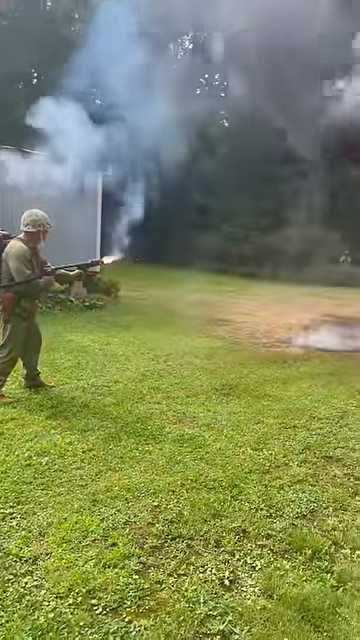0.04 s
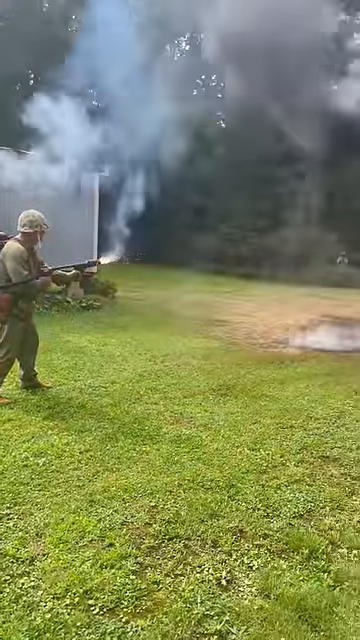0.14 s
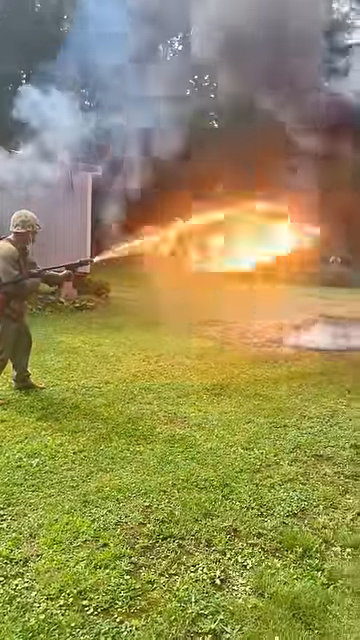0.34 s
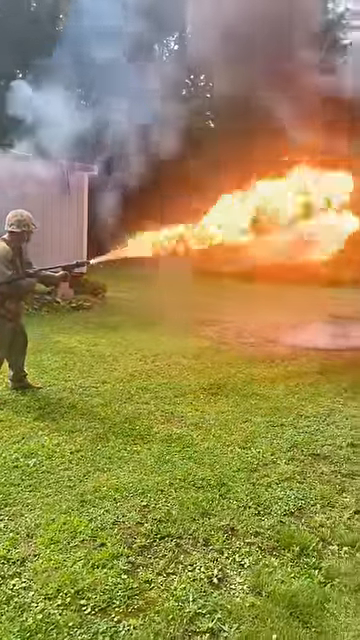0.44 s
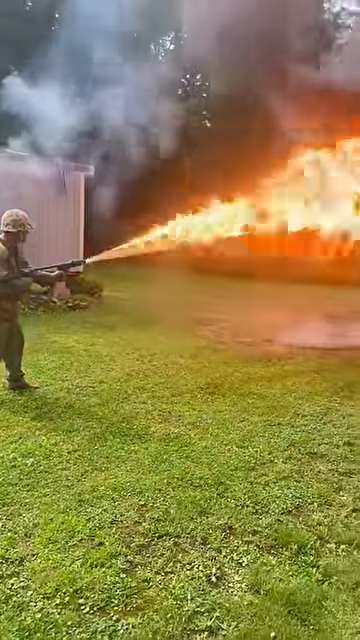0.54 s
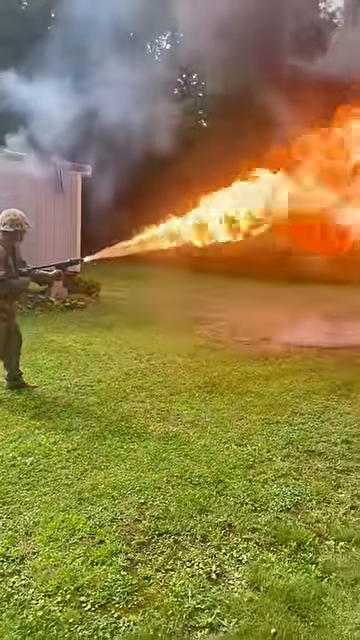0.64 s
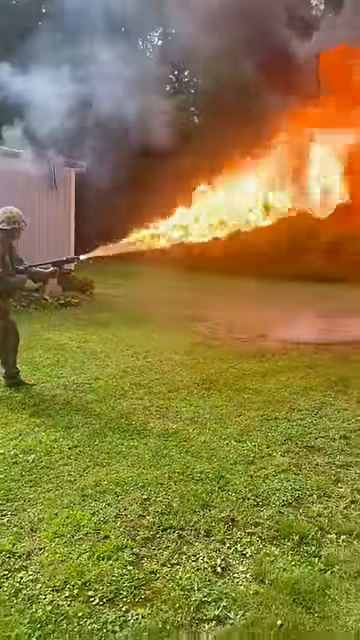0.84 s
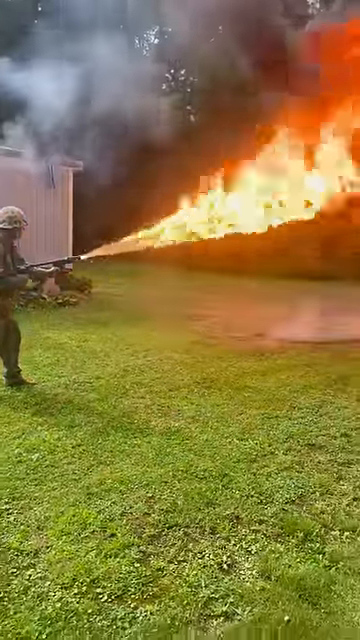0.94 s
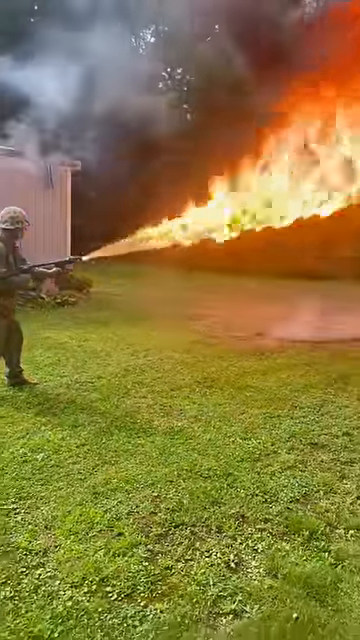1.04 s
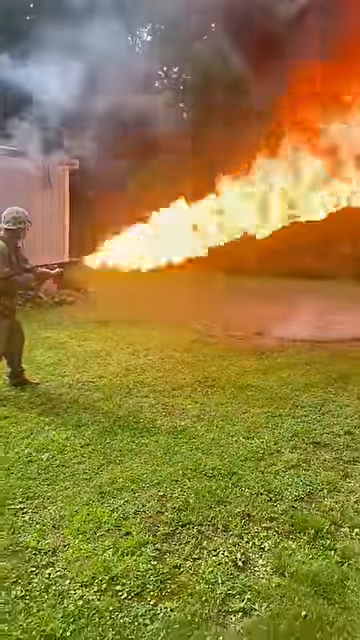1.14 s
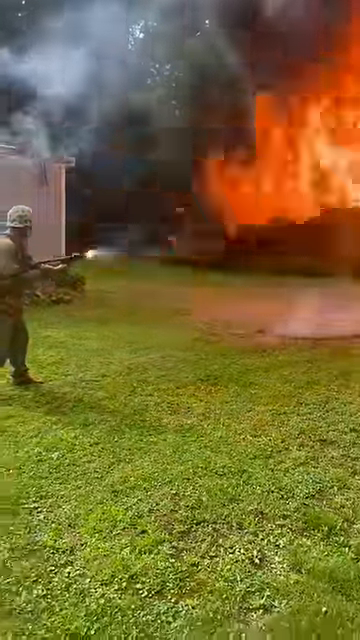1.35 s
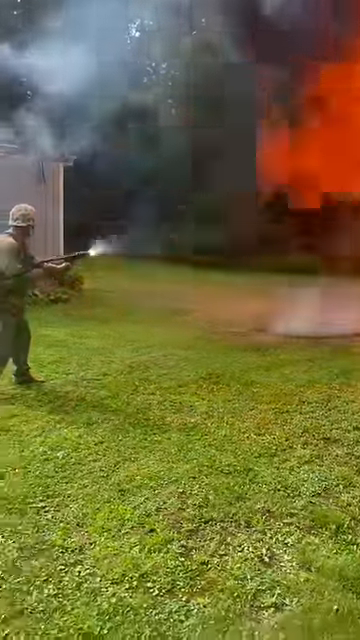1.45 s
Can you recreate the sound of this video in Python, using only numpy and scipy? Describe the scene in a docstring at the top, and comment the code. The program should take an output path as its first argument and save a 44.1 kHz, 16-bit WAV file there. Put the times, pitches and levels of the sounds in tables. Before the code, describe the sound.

A flamethrower ignites and roars outdoors, then cuts off with a lingering hiss.

```python
"""A flamethrower burst on a lawn

The trigger scrapes, the fuel lights with a rush, and pockets of burning fuel thump and roar in the jet.
When the valve shuts the fireball dies down; gas keeps hissing and rings the nozzle in a faint whistle.
A phone some metres away picks this up in stereo, over a quiet outdoor background."""
import sys
import numpy as np
from scipy import signal
from scipy.fft import rfft, irfft, next_fast_len
from scipy.io import wavfile
from scipy.ndimage import uniform_filter1d

SR = 44100
rng = np.random.default_rng(int(sys.argv[2]) if len(sys.argv) > 2 else 0)


def store_pcm(level_fs):
    """Save levels as 16-bit WAV."""
    pcm = np.round(np.clip(level_fs, -1, 1) * 32767).astype(np.int16)
    wavfile.write(sys.argv[1], SR, np.atleast_2d(pcm).T)


N = 66150
TIME = np.arange(N) / SR
FFT_SIZE = next_fast_len(N + 4096)
BIN_HZ = np.arange(FFT_SIZE // 2 + 1) * SR / FFT_SIZE


def flame():
    """Combustion noise: big pockets of fuel thump and rumble, smaller ones roar, and the jet rushes."""
    # Each row: time in seconds, then the levels of thump, rumble, roar and jet in dB.
    levels = [(0.177, -57, -57, -67, -66), (0.181, -48, -42, -40, -49), (0.195, -32, -38.5, -31, -38),
              (0.208, -35, -28, -25, -37), (0.221, -30, -20, -22.5, -39.5), (0.253, -25, -25, -28, -35.5),
              (0.283, -26, -23, -28, -34), (0.297, -15, -13, -28, -33), (0.323, -9.5, -19, -28, -31),
              (0.353, -13.5, -11, -21.5, -29), (0.385, -6.5, -20, -21, -30),
              (0.411, -17.5, -16.5, -21, -30), (0.431, -12.5, -17.5, -24, -34),
              (0.455, -14, -15, -23.5, -31.5), (0.481, -15, -24, -25.5, -33.5),
              (0.515, -13, -19.5, -23, -33.5), (0.537, -13, -19.5, -23, -30),
              (0.581, -16.5, -21.5, -24, -30.5), (0.617, -15, -11.5, -21, -29),
              (0.629, -9, -16, -23, -29.5), (0.707, -17.5, -20, -24.5, -33.5),
              (0.725, -17, -31, -24, -32.5), (0.757, -16, -18, -24.5, -33), (0.787, -16, -25, -23, -31),
              (0.813, -23, -16.5, -24, -31), (0.865, -13.5, -17.5, -23, -32.5), (0.905, -13, -15, -21, -31),
              (0.957, -17.5, -19, -22, -34), (0.989, -10, -15.5, -20, -33.5),
              (1.015, -15.5, -21.5, -24, -30), (1.031, -18, -14, -23.5, -32.5),
              (1.062, -12.5, -19, -19, -30.5), (1.094, -12.5, -14, -20, -31.5),
              (1.118, -16.5, -16.5, -24, -34.5), (1.154, -14.5, -12.5, -25, -37),
              (1.18, -19, -19, -27.5, -40), (1.21, -13, -27, -29.5, -40), (1.236, -24, -33, -32, -42.5),
              (1.262, -18, -32, -32.5, -47), (1.313, -24.5, -29.5, -37, -50), (1.339, -33.5, -36, -40, -56),
              (1.39, -28.5, -36, -42, -59), (1.43, -32.5, -37, -44, -63), (1.46, -31, -38, -44.5, -62),
              (1.5, -49, -39, -46, -66)]
    # Each row of these four spectra: frequency in Hz, relative level in dB.
    thump_spectrum = [(20, -22), (32, -11.5), (45, -3.5), (62, 1.5), (85, -2), (110, -14.5), (200, -32.5)]
    rumble_spectrum = [(50, -32), (85, -5.5), (110, -0.5), (150, -3), (190, -7), (240, -17), (400, -39)]
    roar_spectrum = [(150, -38), (250, -5.5), (320, -0.5), (366, 3.5), (420, -1.5), (470, -2), (600, -3),
                     (800, -6.5), (1200, -9), (1430, -12), (1550, -8.5), (1680, -12.5), (1900, -18),
                     (3000, -29.5)]
    jet_spectrum = [(1000, -8), (1900, -1.5), (2300, -1), (2580, 0), (3000, -4), (3370, -1.5), (3560, -2),
                    (3750, -6.5), (4060, -0.5), (4250, -4), (4700, -8), (5120, -5.5), (5500, -9.5),
                    (6000, -9.5), (9000, -25), (16000, -37)]
    thump = flicker(puffs(900, 1.54), thump_spectrum, band_db=0.95, rate_hz=16.2, common_db=-0.2)
    rumble = flicker(puffs(900, 1.87), rumble_spectrum, band_db=0.8, rate_hz=25, common_db=0.4)
    roar = flicker(puffs(6000, 1.34), roar_spectrum, band_db=1.15, rate_hz=18, common_db=0.22)
    jet = flicker(puffs(15000, 1.5), jet_spectrum, band_db=0.63, rate_hz=12.4, common_db=0.5)
    thump = compress(thump, 0.8, window_s=0.023)
    rumble = compress(rumble, 0.6, window_s=0.021)
    return sum(x * envelope(levels, column) for column, x in enumerate((thump, rumble, roar, jet), 1))


def ignition():
    """A gliding oscillation: the fireball rings once as it lights, its pitch falling as it grows."""
    start_s, end_s, rise_s, decay_s = 0.2255, 0.269, 0.002, 0.004
    growth = np.clip((TIME - start_s) / (end_s - start_s), 0, 1)
    hz = np.interp(growth, [0, 1], [157, 48])
    level_db = np.interp(growth, [0, 1], [-10.25, -5.75])
    attack = np.clip((TIME - start_s) / rise_s, 0, 1)
    decay = np.exp(-np.maximum(TIME - end_s, 0) / decay_s)
    swing = np.sin(2 * np.pi * np.cumsum(hz * (TIME > start_s)) / SR)
    return swing * attack * decay * undb(level_db)


def nozzle():
    """Forced resonance: the broadband hiss of escaping gas drives the narrow modes of the nozzle."""
    # Each row: time in seconds, level of the hiss in dB, gain of the whistle in dB.
    levels = [(0, -58, -60), (.06, -73, -74), (.176, -68, -72), (.19, -49.5, -58), (.23, -44, -46),
              (.3, -38.5, -44), (.7, -38, -38.5), (1.1, -36, -37), (1.25, -41, -43.5), (1.4, -42.5, -43),
              (1.5, -42.5, -41)]
    # Each row: frequency in Hz, relative level of the hiss in dB.
    spectrum = [(1000, -26), (1500, -14), (3000, -8.5), (6200, -7.5), (8000, -7.5), (9800, -2), (10400, -8),
                (11000, -3.5), (12200, -7), (13000, -11), (14900, -12), (15300, -1.5), (15700, -2.5)]
    # Each row: mode frequency in Hz, bandwidth in Hz, relative level in dB.
    modes = [(1550, 45, -10.5), (3524, 58, -14), (4720, 62, -23), (5480, 220, -15), (6874, 310, -7),
             (7500, 160, -29), (8570, 75, -7), (9200, 200, -17), (9460, 110, -15.5), (11300, 350, -15.5),
             (12270, 120, -25)]
    hiss = flicker(noise(), spectrum, band_db=1.17, rate_hz=8.78, common_db=1.15)
    whistle = 0
    for hz, width, db in modes:
        mode = resonate(resonate(noise(), hz, width), hz, width)
        whistle += at_level(mode * undb(1.5 * wander(rate_hz=18)), db)
    return hiss * envelope(levels, column=1) + whistle * envelope(levels, column=2)


def trigger():
    """Friction excitation: short rough scrapes ring the lever, which rattles on faintly."""
    # Each row: time of the peak in seconds, level in dB, Gaussian width in seconds.
    scrapes = [(0.125, -44, 0.003), (0.15, -59, 0.003)]
    # Each row: mode frequency in Hz, bandwidth in Hz, relative gain in dB.
    modes = [(3600, 300, 6), (4300, 900, 0), (5500, 1200, -7), (1730, 600, -6), (732, 300, 3),
             (2700, 1500, -6), (9000, 6000, -15)]
    rattle_db, rattle_s = -12, 0.012
    grit = noise()
    metal = sum(undb(db) * resonate(resonate(grit, hz, 2 * width), hz, width) for hz, width, db in modes)
    contact = 0
    for peak_s, db, width_s in scrapes:
        rattle = undb(rattle_db) * (TIME > peak_s) * np.exp(-abs(TIME - peak_s) / rattle_s)
        contact += undb(db) * (swell(peak_s, width_s) + rattle)
    return at_level(metal, 0) * contact


def distant_hum():
    """Narrowband noise: a low hum swells once before the burst."""
    hum = at_level(resonate(noise(), hz=65.4, width_hz=10.5), 0)
    return compress(hum, 0.99, window_s=0.024) * undb(-45.5) * swell(peak_s=0.078, width_s=0.022)


def lawn():
    """Ambient noise: a quiet outdoor background, strongest in the bass."""
    # Each row: frequency in Hz, relative level in dB.
    spectrum = [(25, -14), (45, -9), (65, -4.5), (110, -16), (200, -21), (500, -23), (1000, -28.5),
                (1400, -34), (1750, -30.5), (2100, -39.5), (5000, -39), (16000, -59)]
    return flicker(noise(), spectrum, band_db=1.2, rate_hz=19.0, common_db=0.4) * undb(-50.5)


def thin_tone():
    """Noise in a very narrow band is heard as a pitch: a faint high tone before the burst."""
    hz, width_hz, end_s = 5180, 30, 0.13
    tone = resonate(resonate(noise(), hz, 2 * width_hz), hz, width_hz)
    return at_level(tone, -69) * (TIME < end_s)


def stereo_image(pair):
    """Stereo width: left and right differ in phase, likeness and level from band to band."""
    # Each row: frequency in Hz, phase lead of the left in radians, likeness 0-1, left minus right in dB.
    image = [(0, 0, 1, -0.5), (249, 0, 1, 1.5), (340, 0.25, 1, 0), (426, 0.5, 0.95, -1), (585, 1, 0.5, 13),
             (850, -1.04, 1, 7), (1320, 1.5, 0.45, 7), (1624, -0.75, 1, 1.5), (1820, 1, 0.84, 3.5),
             (2590, 0.45, 0.52, -0.5), (3040, 2.5, 0.55, 4.5), (3260, 6.5, 0.67, -1), (4600, 6.5, 0.75, -1),
             (4700, 5.5, 0.8, 2.5), (6000, 7.5, 0.1, 0), (7074, 9, 1, 1), (8510, 9.5, 1, -3),
             (8950, 10.5, 0.46, 3), (9850, 11.5, 0.8, 2), (10000, 13, .99, -3), (11800, 13, 0.93, 0),
             (12700, 13.5, .35, 1), (13200, 15.5, .99, 1), (15300, 16, .99, 0), (15560, 17, .6, -1)]
    hz, *columns = np.array(image).T
    lead, likeness, pan_db = (np.interp(BIN_HZ, hz, column) for column in columns)
    likeness = np.clip(likeness, 0, 1)
    left, other = rfft(pair, FFT_SIZE)
    right = likeness * left * np.exp(-1j * lead) + np.sqrt(1 - likeness ** 2) * other
    return irfft(np.array([left * undb(pan_db / 2), right * undb(-pan_db / 2)]), FFT_SIZE)[:, :N]


def puffs(per_s, scatter_db):
    """Shot noise: two independent showers of small blasts of very uneven size."""
    hits = rng.random((2, N)) < per_s / SR
    return hits * rng.standard_normal((2, N)) * undb(scatter_db * rng.exponential(size=(2, N)))


def flicker(x, spectrum, band_db, rate_hz, common_db):
    """Filtering and random modulation: each half octave flickers alone and all swell together."""
    half_octaves = 2 * np.log2(np.maximum(BIN_HZ, 1))
    hz, db = np.array(spectrum).T
    knots = 2 * np.log2(hz)
    coloured = rfft(x, FFT_SIZE) * undb(np.interp(half_octaves, knots, db, left=-80))
    total = 0
    for centre in range(int(knots[0]), int(knots[-1]) + 2):
        triangle = np.clip(1 - abs(half_octaves - centre), 0, 1)
        band = irfft(coloured * triangle, FFT_SIZE)[:, :N]
        total += band * undb(band_db * wander(rate_hz))
    return at_level(total * undb(common_db * wander(rate_hz)), 0)


def wander(rate_hz):
    """Low-pass noise: random steps, smoothed twice, with unit standard deviation."""
    hold = int(SR / rate_hz)
    steps = np.repeat(rng.standard_normal(N // hold + 1), hold)
    drift = uniform_filter1d(uniform_filter1d(steps, hold), hold)[:N]
    return (drift - drift.mean()) / drift.std()


def compress(x, amount, window_s):
    """Compression evens out lulls and lumps, so that the bass rolls on."""
    window = int(window_s * SR)
    power = uniform_filter1d(uniform_filter1d(x ** 2, window), window)
    return at_level(x * (power + 0.05) ** (-amount / 2), 0)


def resonate(x, hz, width_hz):
    """A second-order resonator passes a band around its natural frequency."""
    return signal.lfilter(*signal.iirpeak(hz, hz / width_hz, SR), x)


def envelope(table, column):
    """Amplitude over time, interpolated in decibels."""
    rows = np.array(table)
    return undb(np.interp(TIME, rows[:, 0], rows[:, column], left=-120))


def swell(peak_s, width_s):
    """A Gaussian envelope."""
    return np.exp(-((TIME - peak_s) / width_s) ** 2 / 2)


def noise():
    """Two independent channels of white noise."""
    return rng.standard_normal((2, N))


def at_level(x, db):
    """Scaling to an RMS level in dB."""
    return x * undb(db) / np.sqrt(np.mean(x ** 2))


def undb(db):
    """Decibels as an amplitude ratio."""
    return 10 ** (np.asarray(db) / 20)


def scene():
    """Superposition: flamethrower and background add in one stereo image."""
    background = lawn() + thin_tone() + distant_hum()
    return stereo_image(flame() + ignition() + nozzle() + trigger() + background)


def record(dry):
    """Band limiting and saturation: the phone thins the deepest bass, rounds peaks and cuts the top."""
    bass_cut = signal.butter(2, 33, "high", fs=SR, output="sos")
    top_cut = signal.ellip(14, 0.2, 80, 15720, fs=SR, output="sos")
    rounded = np.tanh(0.83 * signal.sosfilt(bass_cut, dry)) / 0.76
    return signal.sosfilt(top_cut, rounded)


dry = scene()
out = record(dry)
store_pcm(out)
```